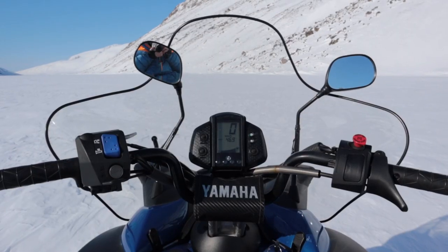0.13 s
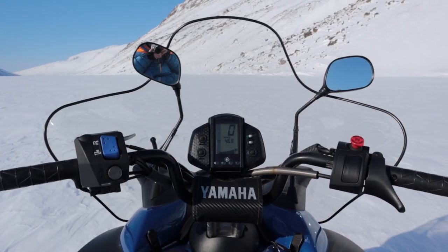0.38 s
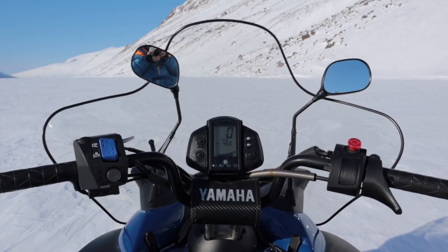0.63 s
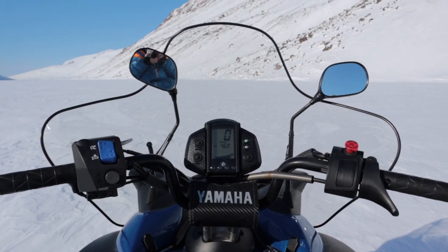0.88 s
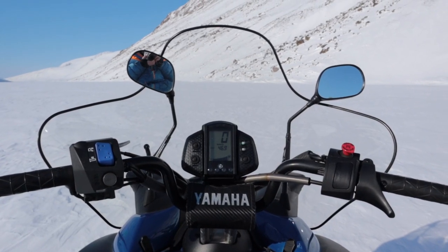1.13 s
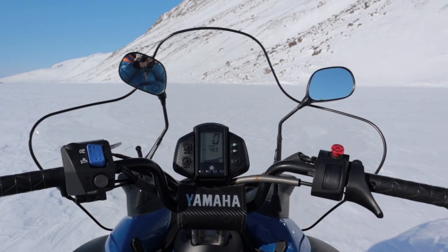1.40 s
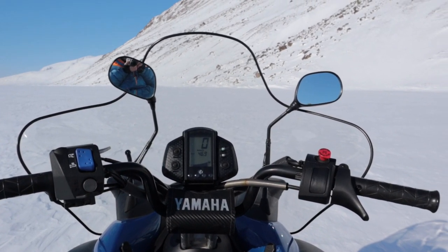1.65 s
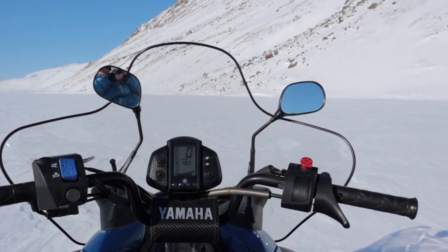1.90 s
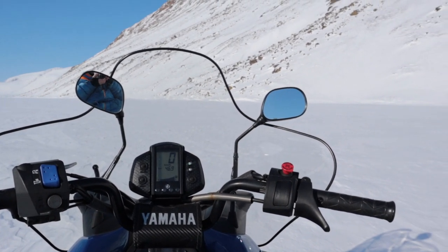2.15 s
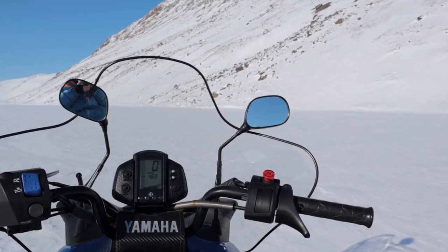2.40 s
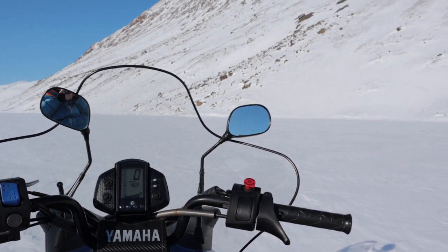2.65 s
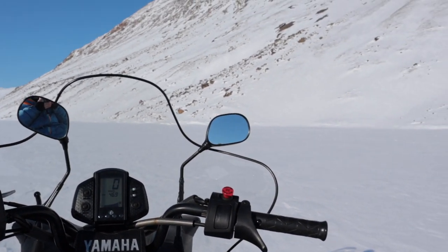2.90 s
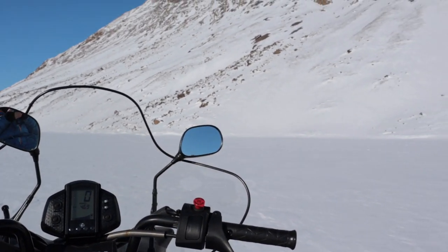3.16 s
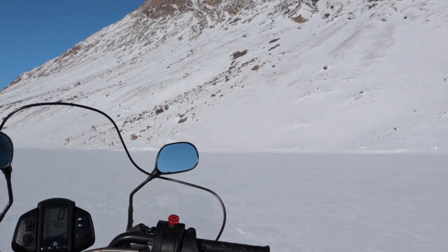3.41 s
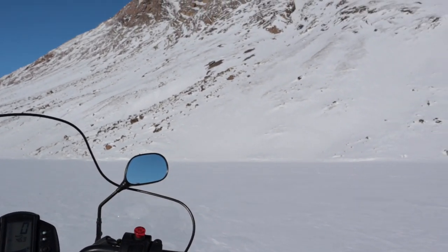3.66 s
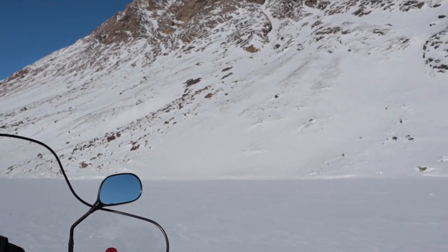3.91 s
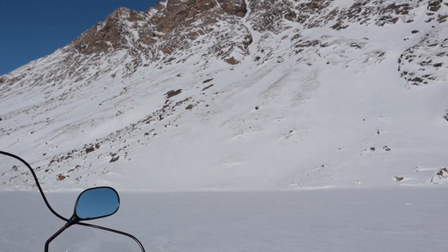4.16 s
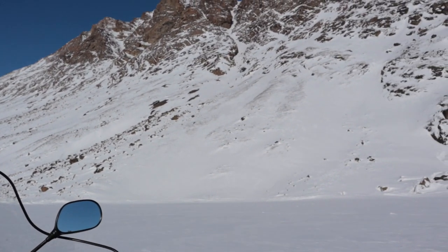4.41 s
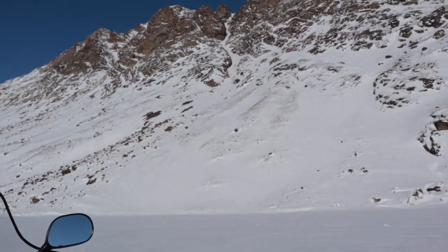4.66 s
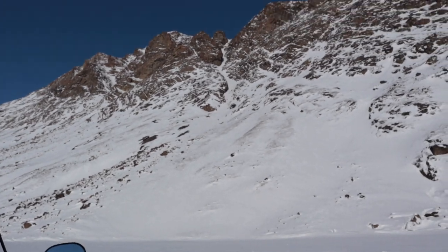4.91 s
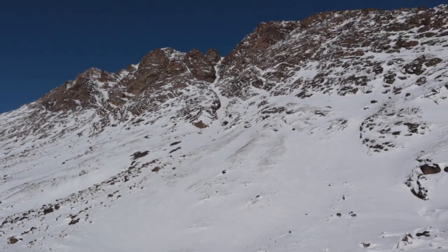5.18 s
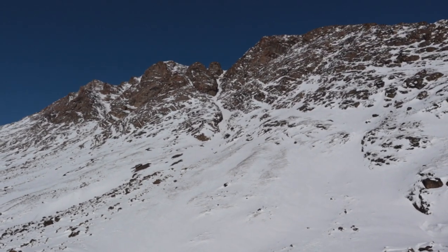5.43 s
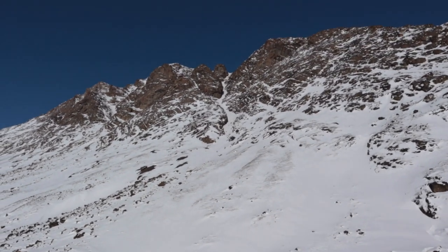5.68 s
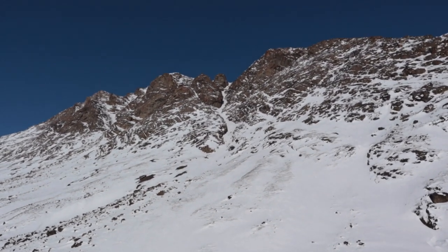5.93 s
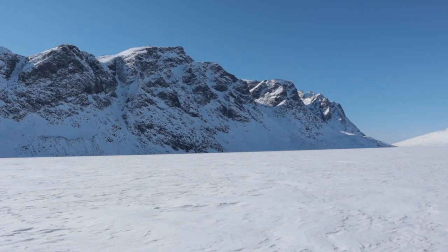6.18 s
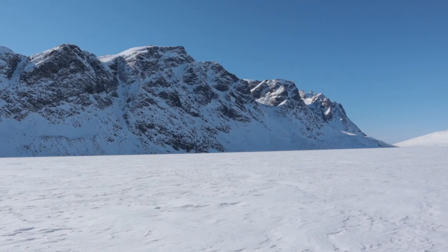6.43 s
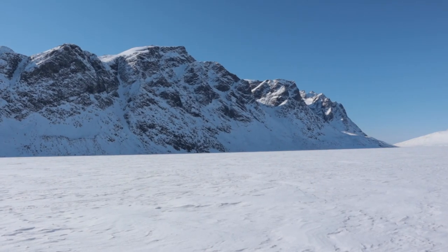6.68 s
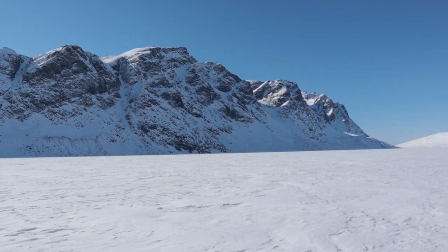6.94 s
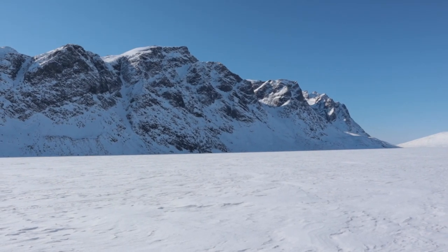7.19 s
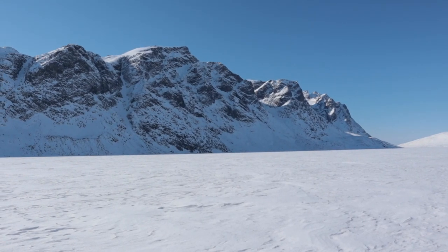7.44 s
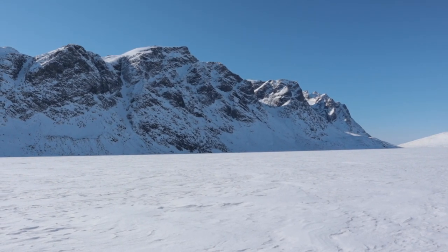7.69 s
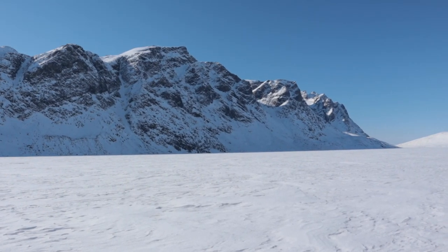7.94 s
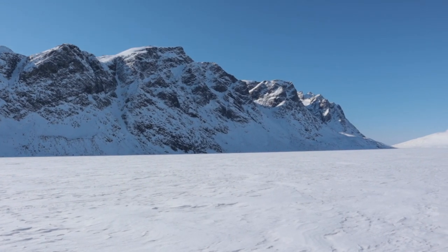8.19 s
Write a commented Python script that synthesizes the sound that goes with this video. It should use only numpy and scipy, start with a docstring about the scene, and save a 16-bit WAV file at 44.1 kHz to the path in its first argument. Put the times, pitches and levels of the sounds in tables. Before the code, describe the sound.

Steady uneven chugging of an idling four-stroke snowmobile on open snow, faint whine and ticking, then abruptly windier with rumbling gusts over the engine.

```python
"""A two-cylinder four-stroke snowmobile idles on open snow, heard at two close ports from the saddle.
Its firings, one soft and one sharp, come close together, then rest; they ring pipe and silencer.
Noise gated by the cycle gives gas rush and clatter; filtered noise gives wind and buffets on one port.
The bearing of the engine turns, then a hard cut leads to a windier view; the port difference is widened."""
import sys
import numpy as np
from scipy import signal
from scipy.fft import rfft, irfft, next_fast_len
from scipy.io import wavfile
from scipy.ndimage import uniform_filter1d, map_coordinates

SR = 44100
rng = np.random.default_rng(int(sys.argv[2]) if len(sys.argv) > 2 else 0)


def level_to_linear(level):
    """Convert decibel levels to linear amplitude factors, elementwise."""
    exponent = np.asarray(level, float) / 20
    return 10 ** exponent


def wav_record(signal):
    """Record a signal, one row per channel, as 16-bit PCM in the file named by sys.argv[1]."""
    frames = np.transpose(np.atleast_2d(signal))
    bounded = np.clip(frames, -1, 1)
    # unit amplitude maps onto the largest positive 16-bit level
    quanta = np.round(bounded * 32767).astype(np.int16)
    wavfile.write(sys.argv[1], SR, quanta)


N = 367132
T = np.arange(N) / SR
CUT_S = 5.9812


def level(x, db):
    """Scale to an rms level in dB."""
    return x * level_to_linear(db) / np.sqrt(np.mean(x ** 2))


def colour(x, gain):
    """Filter by a gain that is a function of frequency in Hz."""
    size = next_fast_len(N)
    hz = np.maximum(np.arange(size // 2 + 1) * SR / size, 1)
    return irfft(rfft(x, size) * gain(hz), size)[..., :N]


def points(table):
    """Gain function through (Hz, dB) points, straight in log frequency."""
    hz_points, db_points = np.transpose(table)
    return lambda hz: level_to_linear(np.interp(np.log(hz), np.log(hz_points), db_points))


def walk(rate_hz):
    """Random levels held 1 / rate_hz and slewed twice; spread 1."""
    hold = int(SR / rate_hz)
    steps = np.repeat(rng.standard_normal(N // hold + 1), hold)
    slewed = uniform_filter1d(uniform_filter1d(steps, hold), hold)[:N]
    return slewed / slewed.std()


def strikes(cycles, part, size, scatter_db, jitter_s):
    """One impulse each cycle at the given part of it, scattered in time and size."""
    late, loud = rng.standard_normal((int(cycles[-1]) + 1, 2)).T
    s = np.interp(np.arange(len(late)) + part, cycles, T, -1, -1) + jitter_s * late
    inside = s > 0
    x = np.zeros(N)
    x[np.clip(s[inside] * SR, 0, N - 1).astype(int)] = size * level_to_linear(scatter_db * loud[inside])
    return x


# Exhaust modes. Each row: frequency in Hz, t60 in seconds, signed relative strength in the first view,
# the same in the second view.
PIPE = [(61.6, .113, -.39, -.33), (106.5, .17, 1, 1), (154, .063, -.58, -.6), (194.8, .2, .07, .03),
        (237.3, .095, -.31, -.14), (275.2, .075, .37, .25)]


def exhaust(cycles, view_index):
    """A soft firing and a sharp one ring the damped modes of pipe and silencer."""
    # the second cylinder is weaker but sharper: its gas takes the shorter way
    second_cycle, second_size = .262, .63
    soft = strikes(cycles, 0, 1, .5, .0001)
    sharp = strikes(cycles, second_cycle, second_size, .5, .0001)
    fired = signal.lfilter(*signal.butter(2, 150, fs=SR), soft)
    fired = fired + signal.lfilter(*signal.butter(2, 1200, fs=SR), sharp)
    lead = np.searchsorted(cycles, cycles[0] + 1)
    fired = np.r_[fired[:lead], fired]  # the pipe is already ringing from the cycle before
    ringing = 0
    for hz, t60_s, *strengths in PIPE:
        pole = np.exp((2j * np.pi * hz - np.log(1000) / t60_s) / SR)
        ringing = ringing + strengths[view_index] * signal.lfilter([1], [1, -pole], fired).imag
    return level(ringing[lead:], 0)


# Colour of turbulent gas leaving the silencer. Each row: frequency in Hz, relative density in dB per Hz.
OUTFLOW = [(20, 1), (60, -6), (110, -1), (210, 2), (260, -2), (330, -5), (420, -9), (600, -12), (800, -14),
           (1300, -32)]


def outflow(cycles):
    """Turbulent gas: a low rush that swells after the firings."""
    swell_db, swell_cycle, under_exhaust_db = 2, .33, -20
    swell = level_to_linear(swell_db * np.cos(2 * np.pi * (cycles - swell_cycle)))
    return level(swell * colour(rng.standard_normal(N), points(OUTFLOW)), under_exhaust_db)


# Broad colour of the block. Each row: frequency in Hz, relative density in dB per Hz.
BLOCK = [(300, -39), (600, 0), (1000, -3), (2000, -9), (2800, -5), (3400, -12), (4200, -13), (5000, -17.5),
         (6300, -17.5), (7400, -19), (8700, -28.5), (11000, -24.5), (12500, -52), (15000, -65)]
# Ringing cowl panels. Each row: frequency in Hz, width in Hz, relative gain in dB.
COWL = [(626, 40, 0), (755, 70, 2), (1107, 45, 1), (1440, 80, 6), (1715, 70, 4), (1890, 40, 1),
        (2030, 50, 4), (2216, 40, 0), (2419, 45, 0), (2900, 140, -2), (3255, 45, -4), (3850, 100, -8),
        (4100, 120, -9)]


def metal(hz):
    """Gain of the block plus resonant cowl panels, all 4 dB below their table."""
    panels = sum(level_to_linear(db - 4) / (1 + 2j * (hz - f) / width) for f, width, db in COWL)
    return points(BLOCK)(hz) + panels


# Valve gear and gas rush through one cycle. Each row: part of cycle (0 to 1), relative level in dB.
BUSY = [(0, 0), (.13, -1.5), (.25, 0), (.33, 0), (.41, -3.5), (.54, -6), (.77, -6.5), (.86, -5), (.91, -.5),
        (1, 0)]
# Valves seating. Each row: part of cycle (0 to 1), relative strike size in dB.
SEATS = [(.08, -6), (.23, -5), (.33, -2), (.92, -6)]


def clatter(cycles):
    """Grainy noise that is busy round the firings, with a short burst at each valve seat."""
    busy = level_to_linear(np.interp(cycles % 1, *np.transpose(BUSY)) + 1.05 * walk(40))
    seats = sum(strikes(cycles, part, level_to_linear(db), 2.1, .0008) for part, db in SEATS)
    bursts = signal.lfilter([1], [1, -np.exp(-1 / (.0011 * SR))], seats)  # 1.1 ms decay
    gate = busy + uniform_filter1d(bursts, size=60)
    grain = rng.standard_normal(N) * level_to_linear(.38 * rng.exponential(size=N))
    return level(colour(gate * grain, metal), 0)


def arrive(x, lag_ms):
    """One sound at two ports, the right one lagging."""
    shift = lag_ms * SR / 2000  # half the lag, in samples
    ports = [map_coordinates(x, [np.arange(N) + way * shift], order=3, mode="nearest") for way in (1, -1)]
    return np.array(ports)


def engine(speed, start_cycle, view, view_index):
    """The machine at both ports; the clatter also comes back unrelated from seat and snow."""
    port_lag_ms, shade_db = .18, 8.5  # for a source straight to one side
    shadow_hz, shadow_lag_ms = 6200, .068  # above this pitch the camera body limits the lag
    outlet_lag_share = .4  # the outlet lies low, nearer the middle between the ports than the block
    s, rpm = np.transpose(speed)
    cycles = np.cumsum(np.interp(T, s, rpm)) / 120 / SR  # two turns a cycle
    cycles = cycles + (start_cycle - np.interp(s[0], T, cycles)) % 1
    s, *columns = np.transpose(view)
    boom_db, clatter_db, bearing_deg = (np.interp(T, s, column) for column in columns)
    lag_ms = port_lag_ms * np.sin(np.radians(bearing_deg))

    boom = level_to_linear(boom_db) * (exhaust(cycles, view_index) + outflow(cycles))
    direct = level_to_linear(clatter_db) * clatter(cycles)
    treble = colour(direct, lambda f: 1 / (1 + (shadow_hz / f) ** 8))
    treble_lag_ms = shadow_lag_ms * np.tanh(1.47 * lag_ms / shadow_lag_ms)
    ports = arrive(direct - treble, lag_ms) + arrive(treble, treble_lag_ms)
    ports = ports + arrive(boom, outlet_lag_share * lag_ms)

    returns = np.array([clatter(cycles), clatter(cycles)])
    ports = ports + level_to_linear(clatter_db - 5.5) * colour(returns, lambda f: 1 / (1 + (900 / f) ** 2))
    # the far port is shaded in the treble
    shade = level_to_linear(np.array([[.5], [-.5]]) * shade_db * lag_ms / port_lag_ms)
    return ports + (shade - 1) * signal.lfilter(*signal.butter(2, 4800, "high", fs=SR), ports)


# Thin steady tones. Each row: frequency in Hz, peak level in dB averaged over the two ports.
WHINE = [(2546, -55), (4420, -93)]


def whine():
    """Steady sines, stronger at the left port."""
    tones = sum(level_to_linear(db) * np.sin(2 * np.pi * hz * T) for hz, db in WHINE)
    return np.array([[1.6], [.4]]) * tones


def wind(table, corner_hz, reference_db, octaves_per_db, bass_ignores, shared_db, own_db, rate_hz, fall):
    """Eddies tumble over a port: bands flutter together and alone; the roll-off corner moves with level.

    bass_ignores: share of a swell that the bass ignores. fall: steepness above the corner."""
    db = np.interp(T, *np.transpose(table))
    corner_hz = corner_hz * 2 ** ((db - reference_db) * octaves_per_db)
    flutter_db = shared_db * walk(rate_hz) + .25 * shared_db * walk(rate_hz / 5)
    out = 0
    for centre in 70 * 2 ** np.arange(0, 6.6, .5):
        band = colour(rng.standard_normal(N), lambda f: np.exp(-(np.log2(f / centre) / .46) ** 2))
        tilt = (centre / 500) ** -.25 / (1 + (centre / corner_hz) ** fall)
        tilt = tilt / (1 + (130 / centre) ** 2) / (1 + (centre / 3200) ** 4)
        steady_db = -bass_ignores * (db - reference_db) / (1 + (centre / 450) ** 2)
        own_flutter_db = own_db * walk(min(centre / 8, 90))
        out = out + band * tilt * level_to_linear(steady_db + flutter_db + own_flutter_db)
    return level(out, 0) * level_to_linear(db)


# Wind in the first view. Each row: time in seconds, level in dB.
BREEZE = [(0, -39.5), (1.75, -41), (2.1, -46), (3.7, -51), (4.15, -36), (4.3, -33), (4.6, -38), (4.7, -21),
          (4.85, -33), (5.1, -33.5), (5.5, -35), (5.98, -29.5)]


def breeze():
    """Light wind over one port, its flutter mostly shared by all bands."""
    return wind(BREEZE, corner_hz=317, reference_db=-41, octaves_per_db=-.06, bass_ignores=-.13,
                shared_db=4.9, own_db=3.6, rate_hz=60, fall=4.2)


# Single buffets of air in both views. Each row: time in seconds, level in dB, upper band edge in Hz.
BUFFETS = [(4.164, -22, 600), (4.261, -13, 1200), (4.51, -27, 600), (4.665, -15, 900), (4.679, -15, 600),
           (4.72, -20, 500), (4.766, -19, 700), (5.455, -27, 500), (5.813, -26, 500), (6.342, -11, 1100),
           (6.483, -15, 1000), (7.229, -13, 1200), (7.4, -13, 1200), (7.53, -10, 1000), (7.653, -14, 1500),
           (7.717, -14, 1300), (7.844, -15, 1300), (7.938, -14, 1700), (7.968, -7, 1300),
           (7.985, -12, 1900), (7.998, -13, 1200), (8.02, -12, 1300)]


def buffets(length_s):
    """Short buffets of air: band-passed noise with a quick front, each at its own strength and reach."""
    out, t = np.zeros(N), np.arange(-200, 1800) / SR
    shape = np.exp(-np.abs(t) / np.where(t < 0, .058 * length_s, length_s))
    for s, db, reach_hz in BUFFETS:
        band = signal.butter(3, [140, reach_hz], "band", fs=SR, output="sos")
        puff = signal.sosfilt(band, shape * rng.standard_normal(len(t)))
        same_energy = np.sqrt(np.sum(shape ** 2) / np.sum(puff ** 2))
        out[int(s * SR) - 200:][:len(t)] += puff * level_to_linear(db) * same_energy
    return out


# Wind in the second view. Each row: time in seconds, level in dB at the windward port.
GUSTS = [(5.98, -21.5), (6.15, -22.5), (6.33, -19.5), (6.39, -24), (6.54, -22), (6.68, -21.5), (6.74, -25),
         (6.9, -21.5), (6.99, -20.5), (7.11, -21), (7.22, -19.5), (7.3, -19.5), (7.52, -21), (7.63, -24),
         (7.67, -21), (7.76, -20), (7.85, -23.5), (7.925, -27.5), (7.945, -21), (8.04, -19), (8.17, -17),
         (8.32, -20.5)]


def gusts(shared_db, own_db, rate_hz, fall):
    """Strong wind over one port: louder air reaches higher in pitch."""
    return wind(GUSTS, corner_hz=1050, reference_db=-20.5, octaves_per_db=.1, bass_ignores=.5,
                shared_db=shared_db, own_db=own_db, rate_hz=rate_hz, fall=fall)


# Idle speed hunting a little. Each row: time in seconds, speed in rpm.
SPEED_FIRST = [(0.0, 1741), (0.94, 1682), (1.07, 1717), (2.04, 1697), (2.17, 1730), (3.2, 1726),
               (3.3, 1691), (3.4, 1721), (4.24, 1709), (5.15, 1738), (5.25, 1714), (5.98, 1708)]
# Each row: time in seconds, exhaust level in dB, direct clatter level in dB, engine bearing in degrees left.
VIEW_FIRST = [(0, -13.5, -33.5, 8.6), (1.5, -13.5, -34.5, 9.6), (2.5, -13, -34.5, 15),
              (3.3, -13, -35.5, 19.5), (4, -13.5, -36, 41), (4.5, -13.5, -37, 44.4), (5.98, -14, -38.5, 47)]


def first_view():
    """Engine turning to the left, thin whine; breeze and buffets on the right port."""
    ports = engine(SPEED_FIRST, .39, VIEW_FIRST, 0) + whine()
    ports[1] += breeze() + buffets(.0037)
    return ports


# Idle speed after the cut. Each row: time in seconds, speed in rpm.
SPEED_SECOND = [(5.98, 1724), (6.95, 1766), (7.05, 1703), (7.15, 1742), (8.15, 1742), (8.33, 1690)]
# Each row: time in seconds, exhaust level in dB, direct clatter level in dB, engine bearing in degrees left.
VIEW_SECOND = [(5.98, -18.5, -40, -41.5), (7.9, -16, -39.5, -45.5), (8.05, -19, -42, -34),
               (8.32, -17, -39, -45)]


def second_view():
    """Engine on the right; gusts and buffets on the left port, the right one sheltered."""
    ports = engine(SPEED_SECOND, .575, VIEW_SECOND, 1)
    ports[0] += gusts(shared_db=2.1, own_db=.44, rate_hz=140, fall=3.39) + buffets(.0029)
    ports[1] += level_to_linear(-23) * gusts(shared_db=1.1, own_db=2.2, rate_hz=110, fall=6.6)
    return ports


def cut_jump():
    """Pressure step where the two views meet, dying away in 2 ms."""
    return -.19 * np.exp(-np.abs(T - CUT_S) / .002)


def scene():
    """Two views joined by a hard cut, as pressure at the left and right ports."""
    return np.where(T < CUT_S, first_view(), second_view() + cut_jump())


def roll_off(x):
    """The treble ends steeply here."""
    return signal.sosfilt(signal.butter(12, 12590, fs=SR, output="sos"), x)


def record(dry):
    """Low cut, then the port difference is raised while an all-pass turns the phase of the sum."""
    low_cut_hz, turn_hz, widen_db = 34.5, 262, 4
    left, right = signal.sosfilt(signal.butter(4, low_cut_hz, "high", fs=SR, output="sos"), dry)
    a = np.exp(-2 * np.pi * turn_hz / SR)
    mid = signal.lfilter([a, -1], [1, -a], (left + right) / 2)
    side = level_to_linear(widen_db) * (left - right) / 2
    return roll_off(np.array([mid + side, mid - side]))


dry = scene()
out = record(dry)
wav_record(out)
```